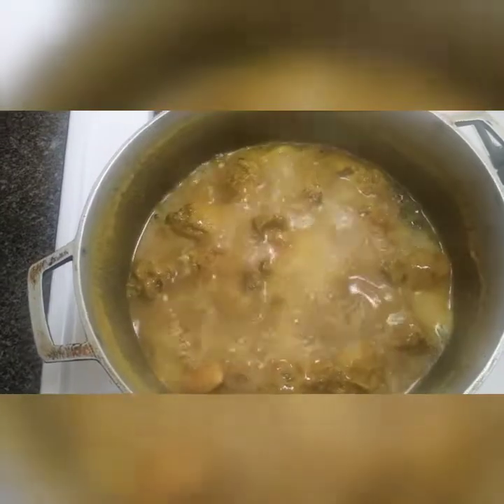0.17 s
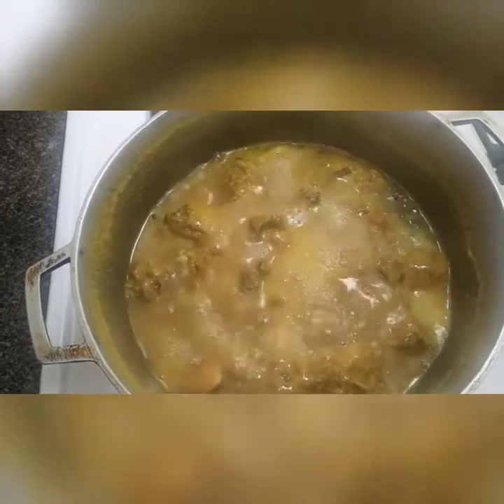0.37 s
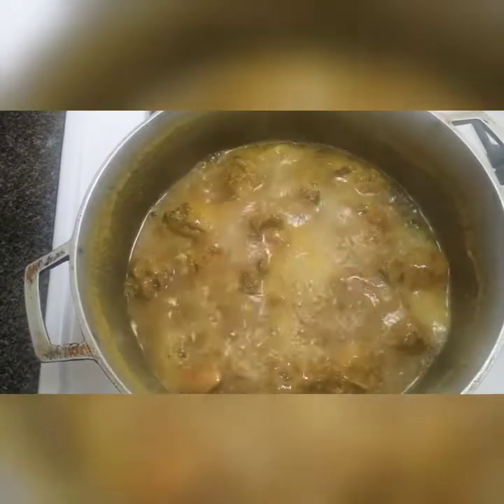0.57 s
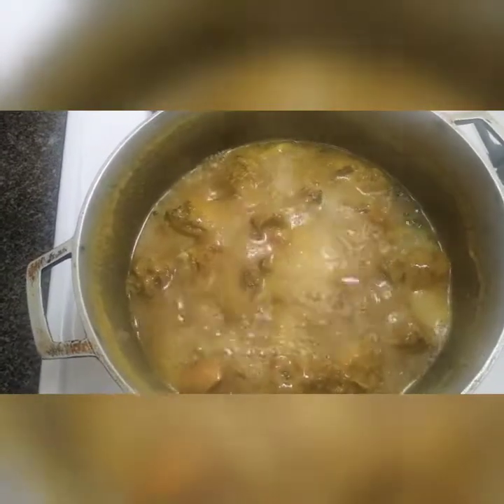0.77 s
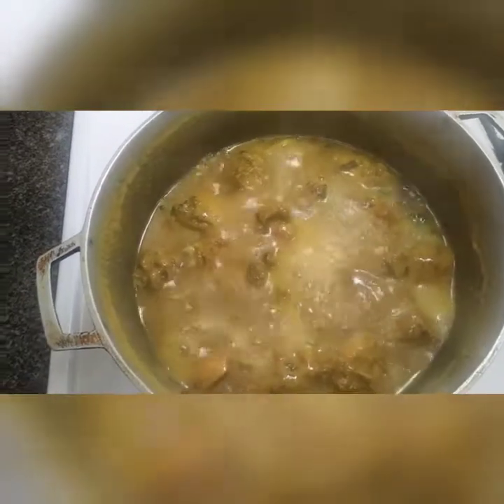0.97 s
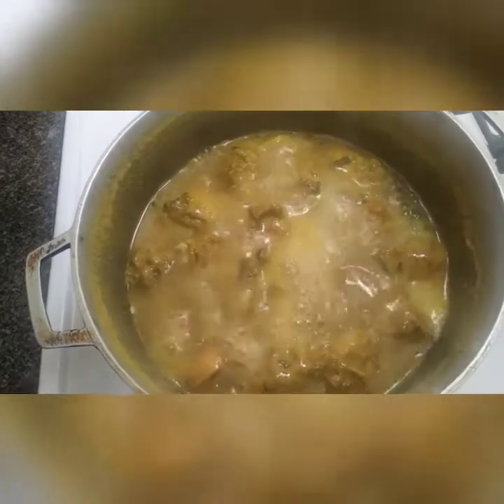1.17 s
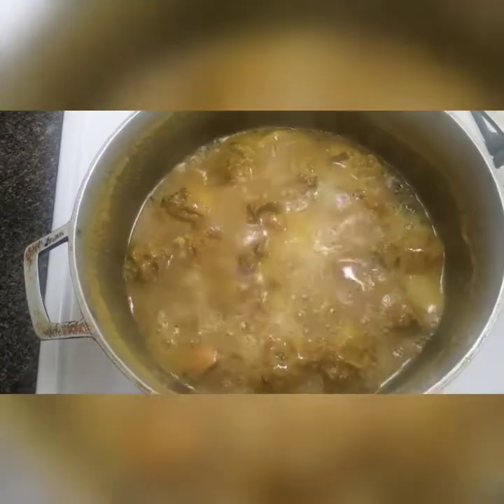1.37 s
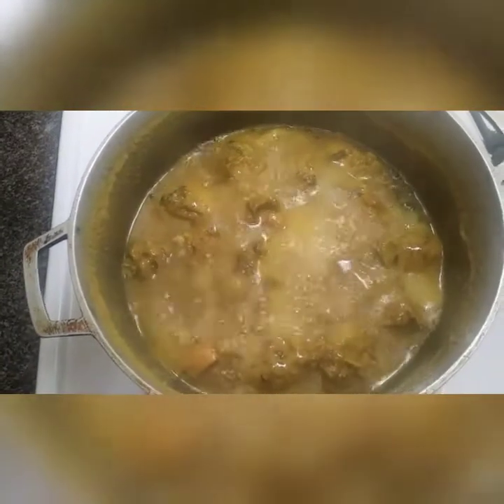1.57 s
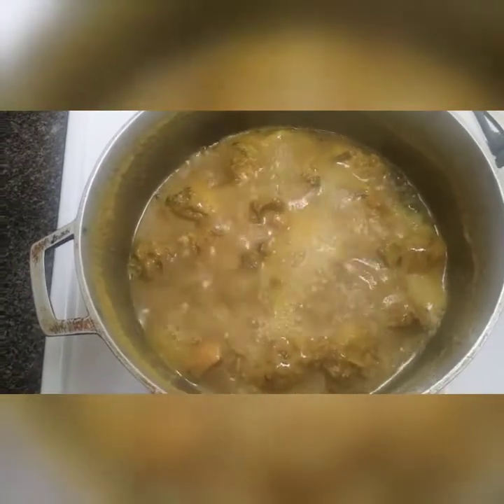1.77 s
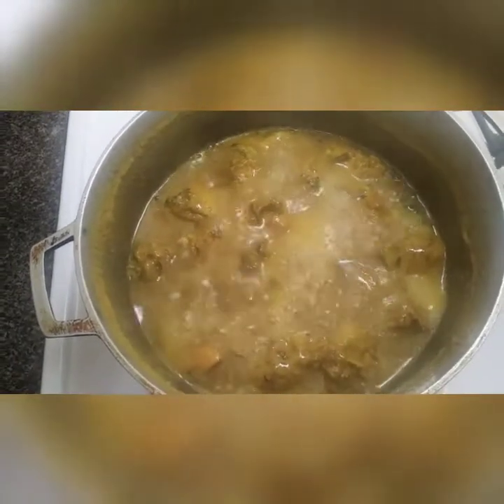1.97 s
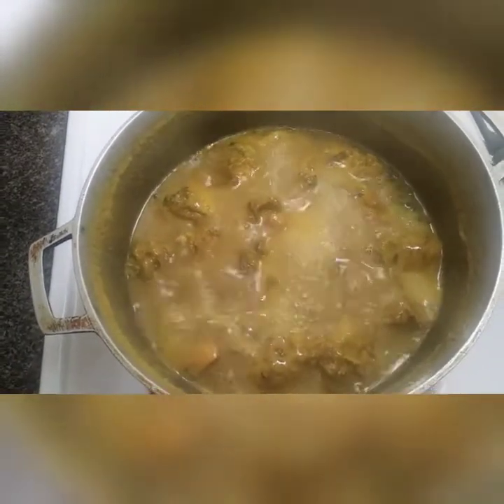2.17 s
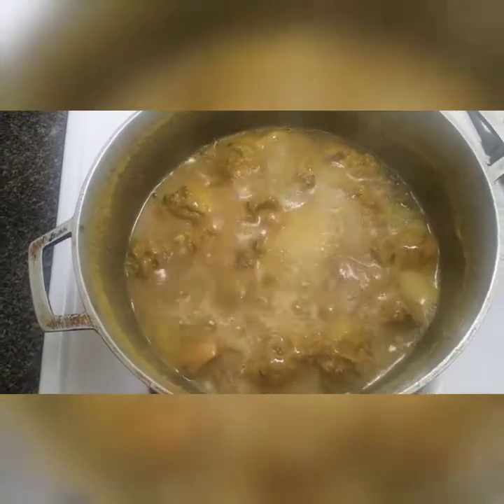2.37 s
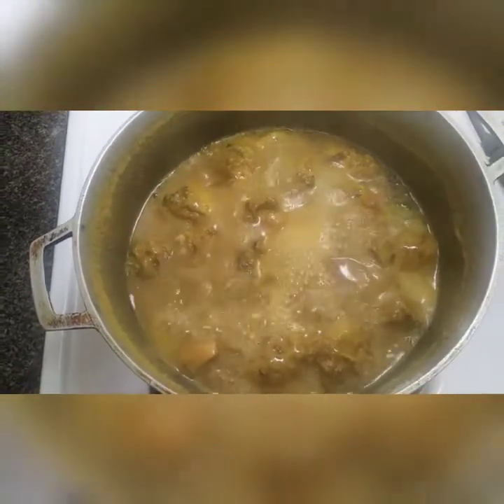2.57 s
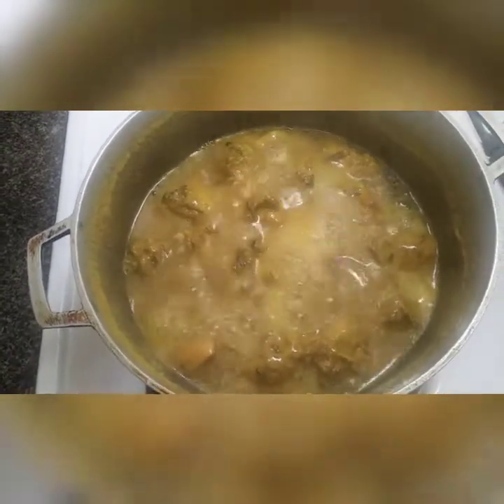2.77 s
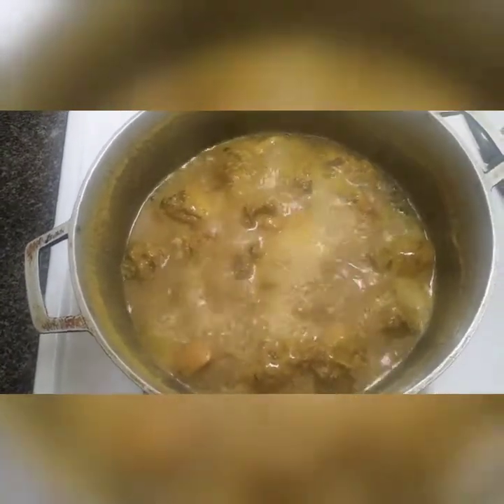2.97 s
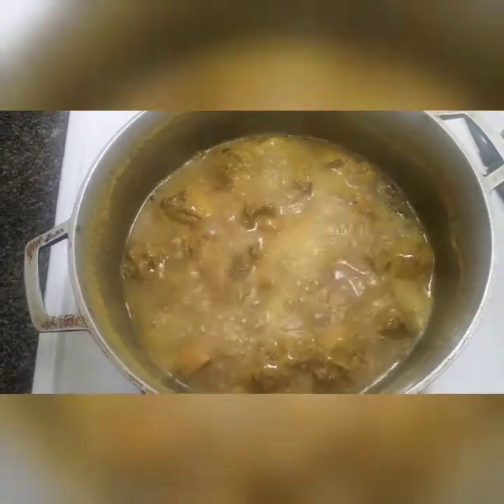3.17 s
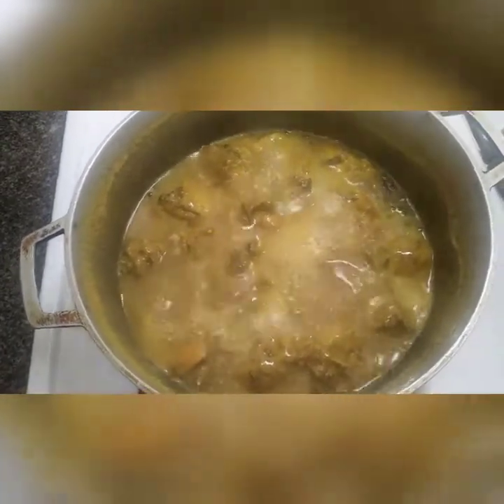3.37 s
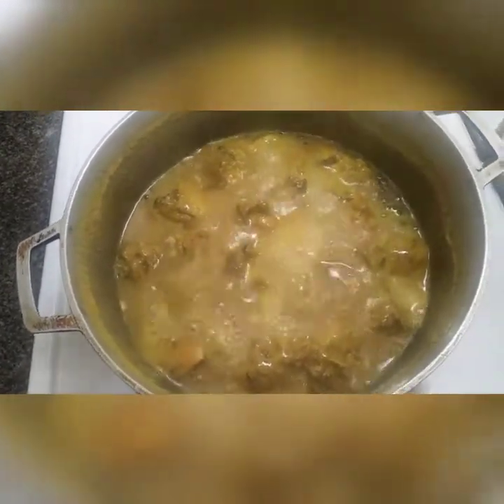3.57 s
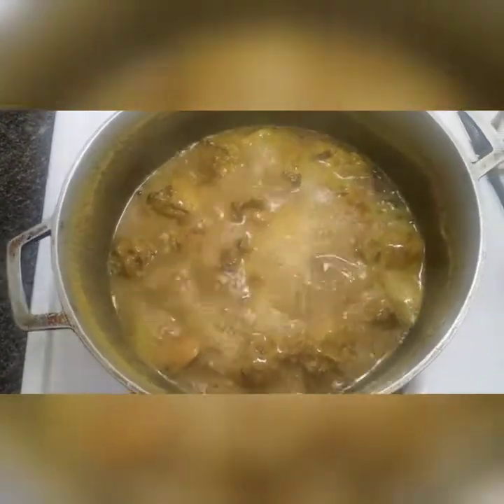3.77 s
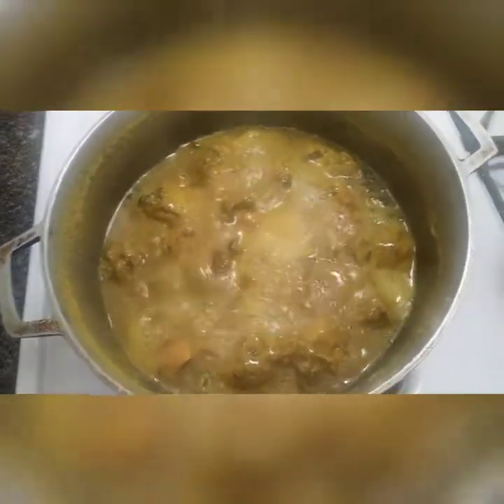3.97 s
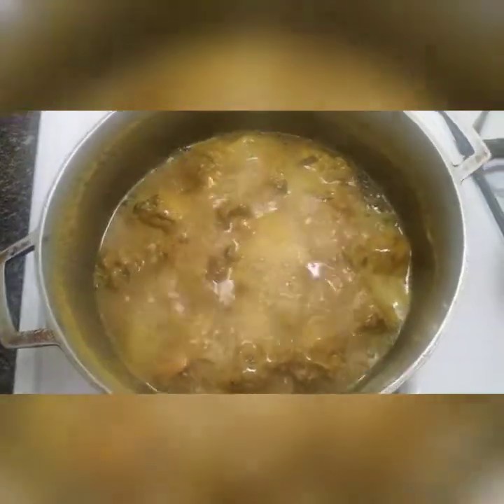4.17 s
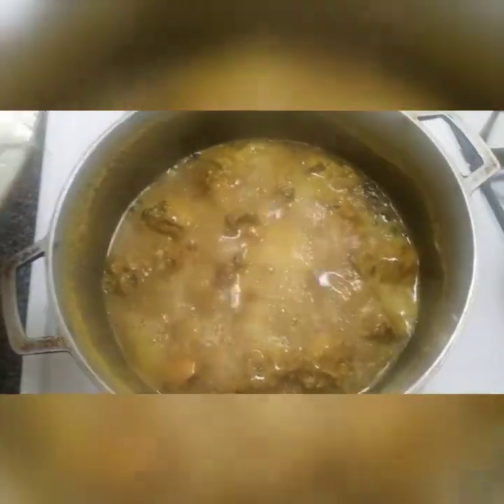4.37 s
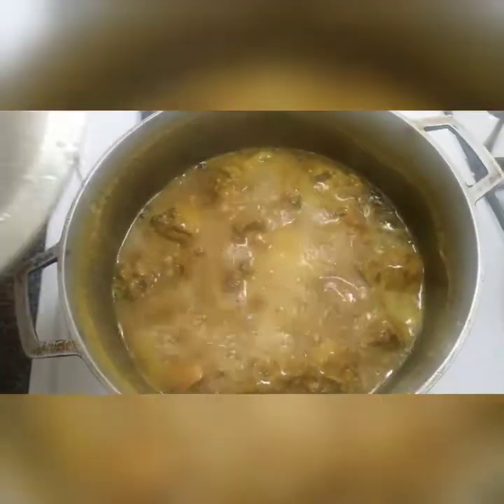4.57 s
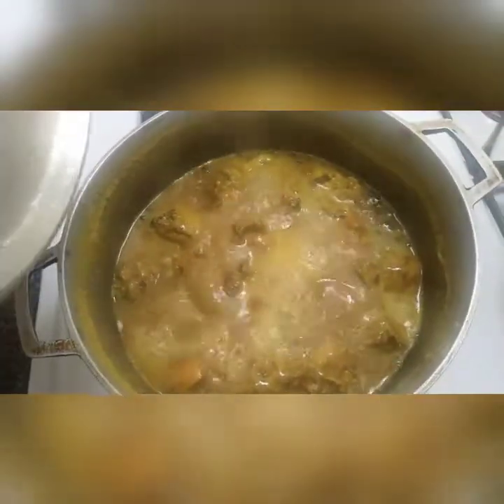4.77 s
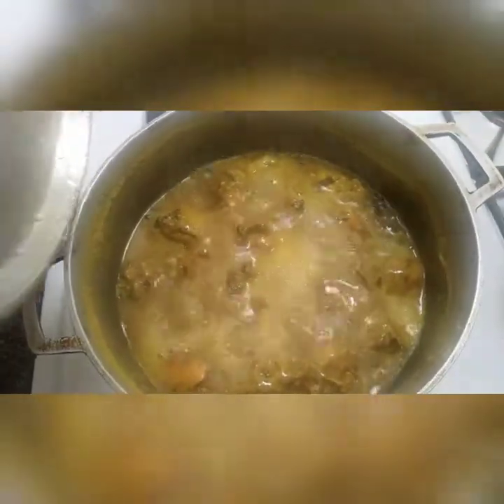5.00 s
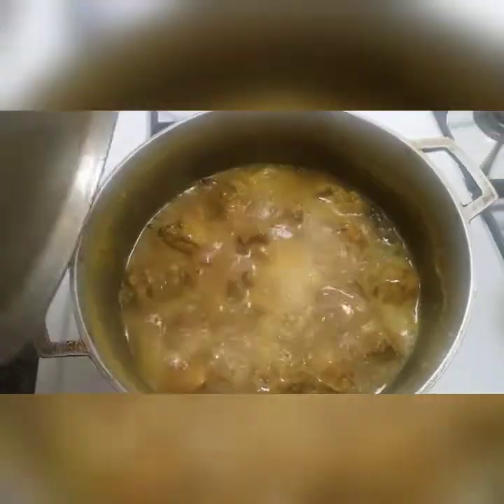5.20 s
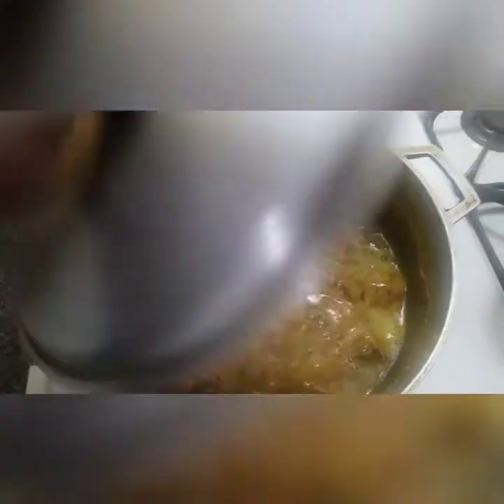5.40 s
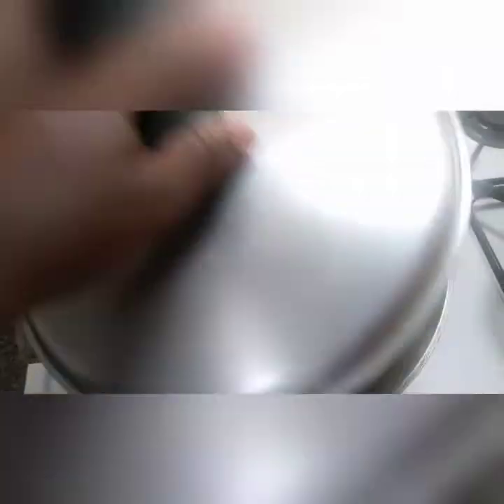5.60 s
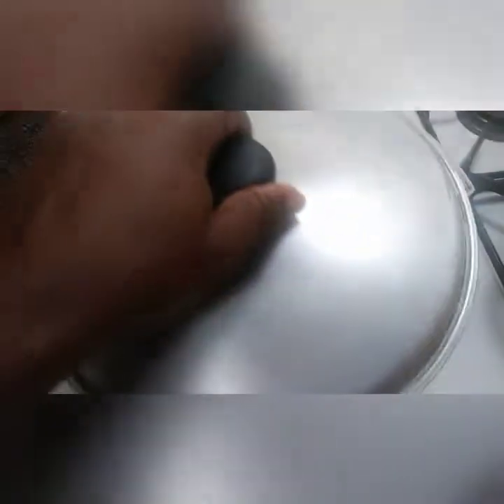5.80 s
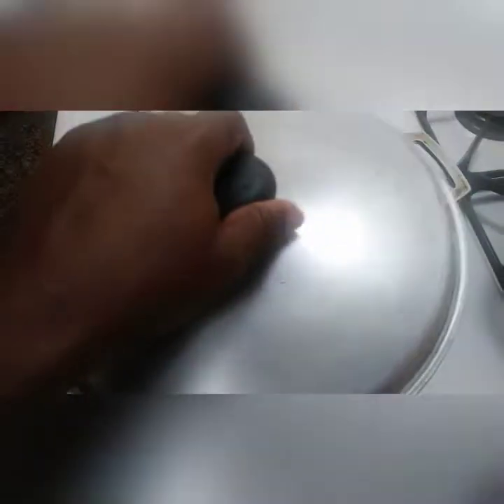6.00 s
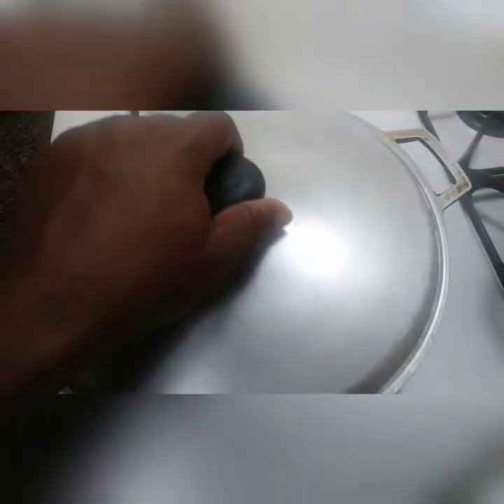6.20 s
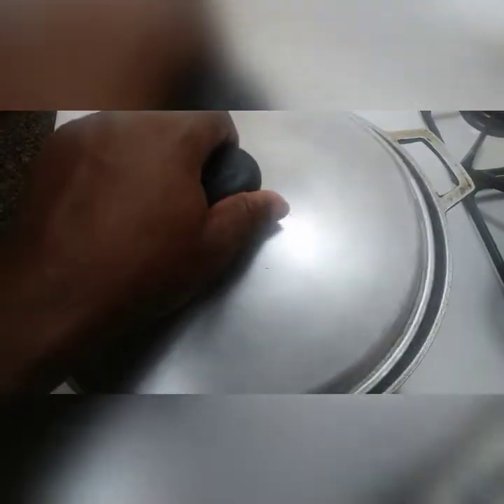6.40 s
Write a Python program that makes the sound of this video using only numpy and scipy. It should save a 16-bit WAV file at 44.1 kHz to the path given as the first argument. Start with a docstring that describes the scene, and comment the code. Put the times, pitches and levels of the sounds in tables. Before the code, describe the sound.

Close microphone over a boiling pot on a gas stove. Viscous bubbles burst continuously and unevenly, with hollow plops, deep gulps and light frothy crackle, while a quiet flame breathes underneath. The froth fades just before the end, when a metal lid bangs down far louder than the boil, rattles, grinds briefly along the rim and settles with a final knock, ringing shortly in the small room.

```python
"""In a small kitchen a thick stew boils steadily in an open aluminium pot on a gas stove.
Swelling, dying tones make the deep gurgles, the blisters popping at the surface and the ticking froth.
Coloured noise makes the flame; a narrow band of noise its faint whistle, a wavering sine the mains hum.
At the end a metal lid clatters onto the rim, scrapes across it with short groans and drops into its seat:
knocks and stick-slip clicks drive its resonant modes."""
import sys
import numpy as np
from scipy import signal
from scipy.fft import rfft, irfft, next_fast_len
from scipy.io import wavfile

SR = 44100
rng = np.random.default_rng(int(sys.argv[2]) if len(sys.argv) > 2 else 0)


def file_out(sig):
    """Save sig as 16-bit WAV at sys.argv[1]."""
    # one column per channel
    cols = np.atleast_2d(sig).T
    # limit, then scale
    lim = np.clip(cols, -1, 1)
    pcm = np.round(lim * 32767).astype(np.int16)
    wavfile.write(sys.argv[1], SR, pcm)


N = 284174
TIME = np.arange(N) / SR   # seconds


def from_db(db):
    """Logarithmic level: decibels to amplitude gain."""
    return 10 ** (np.asarray(db) / 20)


def rms_one(x):
    """Normalisation: scale to an rms of 1."""
    return x / np.sqrt(np.mean(x ** 2) + 1e-20)


def in_time(rows):
    """Linear interpolation: each column of a curve at every sample."""
    seconds, *columns = np.transpose(rows)
    return [np.interp(TIME, seconds, column) for column in columns]


def at_hz(points, hz):
    """Logarithmic pitch: read a table on a log-frequency axis."""
    table_hz, values = np.array(points)[:, 0], np.array(points)[:, 1]
    return np.interp(np.log(np.maximum(hz, 1)), np.log(table_hz), values)


def noise(spectrum, size):
    """Spectral shaping: white noise weighted to a given colour, rms 1."""
    n = next_fast_len(size)
    white = rfft(rng.standard_normal(n))
    gain = from_db(at_hz(spectrum, np.fft.rfftfreq(n, 1 / SR)))
    return rms_one(irfft(white * gain, n)[:size])


def drift(rate):
    """Slow random modulation: chance values, rate per second, joined by lines; spread about 1."""
    return np.interp(TIME * rate, np.arange(2048), rng.standard_normal(2048))


def band(x, hz, kind, order=2):
    """Band limiting: a Butterworth filter with a flat passband."""
    edges_hz = np.clip(hz, 10, SR / 2 - 1000)
    return signal.sosfilt(signal.butter(order, edges_hz, kind, fs=SR, output="sos"), x + 1e-18)


def ring(force, hz, t60):
    """Damped resonance: a unit click sets a sine of height about 1 ringing, 60 dB down after t60."""
    decay, turn = from_db(-60 / (t60 * SR)), 2 * np.pi * hz / SR   # per sample
    return signal.lfilter([0, np.sin(turn)], [1, -2 * decay * np.cos(turn), decay * decay], force + 1e-18)


def clicks(per_s, spread_db):
    """Poisson impulses: clicks at random instants, most small and a few large."""
    born = np.flatnonzero(rng.random(N) < per_s / SR)
    sizes = rng.exponential(1, 8192)
    signs = rng.choice([-1, 1], 8192)
    pick = born % len(sizes)
    out = np.zeros(N)
    out[born] = from_db(spread_db * np.minimum(sizes[pick], 4)) * signs[pick]
    return out


def add(out, s, sound):
    """Superposition: mix a sound in at a given time."""
    i = int(np.clip(round(s * SR), 0, N - 1))
    out[i:i + len(sound)] += sound[:N - i]


# Reverberation of the room. Each row: frequency in Hz, t60 in seconds.
KITCHEN_T60 = [(100, 0.91), (1000, 0.16), (4000, 0.17), (14000, 0.15)]


def kitchen(x):
    """Diffuse reverberation: an exponential noise tail off hard walls, by frequency band; unit energy."""
    t = TIME[:SR // 2]
    edges = np.geomspace(60, 18000, 9)
    tail = np.zeros(len(t))
    for low, high in zip(edges, edges[1:]):
        decay = 1000 ** (-t / at_hz(KITCHEN_T60, np.sqrt(low * high)))
        tail += band(rng.standard_normal(len(t)), [low, high], "band") * decay
    tail = tail * np.minimum(t / 0.006, 1)   # 6 ms for the echoes to build up
    return signal.oaconvolve(x, tail / np.linalg.norm(tail))[:N]


# Spectrum of gas flame and steam. Each row: frequency in Hz, relative density in dB per Hz.
FLAME_SPECTRUM = [(25, -14), (45, -17), (72, -1), (92, -7), (135, 5.5), (185, -5), (300, -6), (600, -9),
                  (1000, -8), (2900, -11.5), (3800, -18.5), (5800, -19), (9500, -31), (12500, -37)]
JET_HZ, JET_WIDTH_HZ, JET_DB = 9160, 220, -72.5   # the gas jet whistles faintly


def stove():
    """Turbulence noise: the steady flame and its jet's thin whistle, over a wavering mains hum."""
    flame = from_db(-47) * noise(FLAME_SPECTRUM, N)
    jet_edges = [JET_HZ - JET_WIDTH_HZ / 2, JET_HZ + JET_WIDTH_HZ / 2]
    jet = from_db(JET_DB) * rms_one(band(rng.standard_normal(N), jet_edges, "band"))
    hum_hz = 119.7 + 1.1 * drift(6.41)
    hum_level = from_db(-53 + 0.61 * drift(2.04))
    hum = hum_level * np.sin(2 * np.pi * np.cumsum(hum_hz) / SR)
    return flame + jet + hum


# The rim catches and groans. Each row: start in seconds, length in seconds, level in dB, pitch in Hz.
RIM_GROANS = [(6.154, .06, -24.5, 410), (6.254, 0.059, -24.5, 386), (6.339, 0.092, -18.5, 378.6)]
GROAN_WAVER_HZ, GROAN_EDGE_S = 1.97, 0.016


def groan():
    """Stick-slip locking: where the rim catches, friction locks onto one of the lid's lowest modes."""
    out = np.zeros(N)
    for s, length, db, hz in RIM_GROANS:
        edges = np.clip(np.minimum(TIME - s, s + length - TIME) / GROAN_EDGE_S, 0, 1)
        pitch = hz + GROAN_WAVER_HZ * drift(40)
        out += from_db(db) * edges * np.sin(2 * np.pi * np.cumsum(pitch) / SR)
    return out


# Lid meeting the rim. Each row: start in seconds, strength in dB, contact brightness (low-pass) in Hz.
RIM_KNOCKS = [(6.0700, 5, 8000), (6.0845, 1.5, 6800), (6.0910, 2, 5100), (6.122, -3.5, 2600),
              (6.1920, -5.5, 1920), (6.1976, -1, 2600), (6.2090, -2.5, 1610), (6.282, -6, 1600),
              (6.371, -2.5, 1596), (6.4200, 1, 2360)]
# Lid and pot ringing together, one entry a mode: pitch in Hz, rms level through the clatter in dB,
# t60 in seconds.
MODE_HZ = [386, 405, 435, 1017, 1328, 1770, 1802, 1930, 1982, 2188, 2572, 2751, 2842, 2906, 2994, 3113,
           3682, 3726, 3960, 4372, 4423, 4473, 5320, 5507, 6832, 6878, 8481, 10240, 12140, 14080]
MODE_DB = [-30.5, -32.5, -35.5, -36, -45, -23.5, -17.5, -20.5, -20.5, -25, -31.5, -34, -23, -28, -29, -30.5,
           -39, -29, -26.5, -42, -32.5, -40, -25.5, -35, -37, -36, -31.5, -42, -61, -62]
MODE_T60 = [.5, 0.25, 0.31, 0.4, .3, 0.14, 0.093, 0.22, 0.18, 0.14, 0.71, 0.36, 0.16, 0.15, 0.14, 0.51,
            0.45, 0.58, 0.37, 0.26, 0.24, 0.45, 0.26, 0.16, 0.15, 0.34, 0.16, 0.51, 0.42, 0.39]
# The many weak, short modes of the thin metal. Each row: frequency in Hz, relative density in dB per Hz.
CLASH_SPECTRUM = [(30, -40), (70, -17), (220, -15), (400, -4), (600, -6.5), (860, -42), (1020, -5),
                  (1350, -5.5), (1550, -16), (1900, 5.5), (2400, -9), (3000, -8.5), (5500, -8.5),
                  (8000, -17.5), (11000, -27), (15500, -35)]
SLIDE_START_S, SLIDE_RISE_S = 6.08, 0.069   # after landing the lid is pushed across the rim
SCRAPE_DB, SCRAPE_FADE_DB_PER_S = -36.5, 16.5   # the push eases as it goes
GRIT_DB, GRIT_RISE_S, GRIT_FADE_S = -26.5, 0.081, 0.013   # grinding peaks as the lid drops into its seat
FLUTTER_DB, FLUTTER_FROM_HZ = 4.5, 1900   # rocking on the rim; full flutter from this pitch up


def lid():
    """Modal excitation: knocks and stick-slip scraping drive the metal's damped modes."""
    landed_s, seated_s = RIM_KNOCKS[0][0], RIM_KNOCKS[-1][0]
    moving = TIME >= landed_s
    sliding_s = np.maximum(TIME - SLIDE_START_S, 0)
    slips = moving * rms_one(clicks(3000, spread_db=2.5))
    push = np.minimum(sliding_s / SLIDE_RISE_S, 1) * from_db(SCRAPE_DB - SCRAPE_FADE_DB_PER_S * sliding_s)
    scrape = push * band(slips, [330, 2400], "band", order=3)
    touches = [from_db(db) * band(signal.unit_impulse(128), hz, "low") for s, db, hz in RIM_KNOCKS]

    def force(shares):
        """Superposed contact forces: the scrape and all knocks, each with its own weight."""
        out = scrape.copy()
        for knock, touch, share in zip(RIM_KNOCKS, touches, shares):
            add(out, knock[0], share * touch)
        return out

    modes = np.zeros(N)
    for hz, db, t60 in zip(MODE_HZ, MODE_DB, MODE_T60):
        signs = rng.choice([-1, 1], len(RIM_KNOCKS))   # each knock lands on another lobe of the mode
        flutter_db = FLUTTER_DB * min(hz / FLUTTER_FROM_HZ, 1) * drift(70)
        partial = from_db(flutter_db) * ring(force(signs), hz, t60)
        modes += from_db(db) * partial / np.std(partial[moving])

    t = TIME[:SR // 3]
    crash_decay = from_db(-24 - t * 110) + from_db(-6.5 - t * 1420)   # a long part and a very short one
    crash = noise(CLASH_SPECTRUM, len(t)) * crash_decay
    clash = signal.oaconvolve(force(np.ones(len(RIM_KNOCKS))), crash)[:N]

    grinding = np.exp(np.minimum((TIME - seated_s) / GRIT_RISE_S, (seated_s - TIME) / GRIT_FADE_S))
    grit = from_db(GRIT_DB) * grinding * band(slips, [3000, 7000], "band", order=3)
    metal = band(modes, 226, "high") + clash + grit   # a thin sheet radiates little bass
    return metal + groan() + from_db(-19) * kitchen(metal)


def bubble(hz, cycles):
    """Cavity resonance: a tone that swells for the given cycles and dies as the cavity opens."""
    age = np.arange(int(8 * cycles * SR / hz)) * hz / SR   # in cycles
    swell = age / cycles * np.exp(1 - age / cycles)
    # the slope of the motion radiates; the divisor restores its height
    return np.gradient(swell * np.cos(2 * np.pi * age)) / np.sin(2 * np.pi * hz / SR)


def swarm(spectrum, per_s, cycles, spread_db, count):
    """Incoherent summation: countless random bubbles in count sizes; rms 1."""
    out = np.zeros(N)
    for hz in np.geomspace(spectrum[0][0], spectrum[-1][0], count):
        one_size = signal.oaconvolve(clicks(per_s / count, spread_db), bubble(hz, cycles))[:N]
        # a log-spaced band widens with pitch, hence the root
        out += rms_one(one_size) * from_db(at_hz(spectrum, hz)) * np.sqrt(hz)
    return rms_one(out)


def bursts(rows, cycles, snap_db, snap_ratio, spatter_db, spatter_s, thump_db, ring_s=0, count=4):
    """Cavity collapse: a loud bubble's tone, the snap of its skin, a low thump and a few daughter bubbles."""
    out = np.zeros(N)
    for (s, db, hz), chance in zip(rows, rng.random((len(rows), count, 2))):
        turns = max(cycles, ring_s * hz)
        add(out, s, from_db(db) * bubble(hz, turns))
        snap_hz = min(hz * snap_ratio, SR / 4)
        add(out, s, from_db(db + snap_db) * bubble(snap_hz, cycles=0.59))
        # the liquid falls back into the hole
        add(out, s + 2 / hz, from_db(db + thump_db) * bubble(hz / 2, cycles))
        for late, size in chance:
            daughter_hz = min(hz * 2 ** (size - .5), SR / 4)
            daughter = from_db(db + spatter_db - 19 * late) * bubble(daughter_hz, turns)
            add(out, s + late * spatter_s, daughter)
    return out


def lesser(per_s, db, spread_db, low_hz, high_hz):
    """Poisson process: rows of (s, dB, Hz) for bubbles that burst by chance."""
    chance = rng.random((128, 3))
    times = np.cumsum(-np.log(1 - chance[:, 0])) / per_s
    levels = db + spread_db * np.sqrt(3) * (2 * chance[:, 1] - 1)   # uniform, spread_db its deviation
    pitches = low_hz * (high_hz / low_hz) ** chance[:, 2]
    return [row for row in zip(times, levels, pitches) if row[0] < TIME[-1]]


# Liquid heaving round a blister, relative to its pop.
SPLASH_DB, SPLASH_RISE_S, SPLASH_FADE_S = -14.5, 0.0065, 0.0093


def splash(pops):
    """Amplitude envelope: liquid heaves around each burst with a quick swell and a slower fall."""
    out, t = np.zeros(N), TIME[:SR // 8]
    heave = np.minimum(t / SPLASH_RISE_S, np.exp((SPLASH_RISE_S - t) / SPLASH_FADE_S))
    for s, db, hz in pops:
        add(out, s - SPLASH_RISE_S, from_db(db + SPLASH_DB) * heave)
    return out


# Single bubbles: the largest blisters bursting, the sharpest droplets snapping, and the biggest bubbles
# breaking loose deep down. Each row: start in seconds, relative peak level in dB, pitch in Hz.
BLISTERS = [(0.389, -28, 1210), (0.629, -29.5, 1210), (0.691, -27, 2780), (0.72, -27, 1710),
            (0.813, -30, 1250), (0.963, -23, 2110), (0.9955, -29.5, 860), (1.237, -25, 2130),
            (1.523, -26.5, 1900), (1.733, -26, 1170), (1.9, -30.5, 650), (2.019, -27, 2700),
            (2.045, -28.5, 1490), (2.215, -28, 1180), (2.624, -32, 1740), (2.889, -27, 1210),
            (2.998, -27, 1580), (3.241, -29, 1170), (3.324, -26, 1180), (3.575, -31, 710),
            (3.721, -26, 1210), (3.7975, -25, 1190), (4.022, -24, 1260), (4.319, -24.5, 1400),
            (4.353, -28.5, 1410), (4.559, -24.5, 2970), (4.627, -23, 1560), (4.766, -29, 2140),
            (5.173, -25.5, 645), (5.315, -28, 1810)]
DROPLETS = [(1.263, -32, 8700), (1.4876, -40, 4750), (1.626, -32.5, 8300), (1.695, -26, 6320),
            (2.3583, -33.5, 5750), (2.8944, -31, 7560), (3.388, -29, 8200), (3.405, -30, 6400),
            (3.7824, -34.5, 6360), (4.2215, -33, 8300), (4.4658, -30.5, 7400), (4.631, -30.5, 5740),
            (5.0296, -27.5, 6600), (5.2844, -31, 6100)]
DEEP_BUBBLES = [(0.433, -32, 368), (1.142, -31, 272), (2.244, -30, 270), (3.185, -30, 297),
                (3.383, -33.5, 354), (4.452, -32.5, 350)]
# Lesser bubbles at random. Each holds: rate per second, mean relative peak level in dB, spread in dB,
# lowest and highest pitch in Hz.
LESSER_BLISTERS = (7, -35.5, 1, 598, 1904)
LESSER_DROPLETS = (6, -41.5, 4.5, 4500, 7500)
LESSER_DEEP = (2, -44, 3, 292, 420)
# Bubble pitches of the swarms. Each row: frequency in Hz, relative density in dB per Hz.
GURGLE_SPECTRUM = [(200, -25), (265, 4), (310, -7), (375, 3), (490, -12), (580, -4), (720, -18)]
POPPING_SPECTRUM = [(600, 10.5), (830, 3), (1000, -29), (1220, 6), (1600, 4), (2300, 4), (3000, 1.5)]
FROTH_SPECTRUM = [(4400, 1), (5300, 0.5), (6300, 2.5), (8000, -11.5), (9400, -2.5), (12000, -28),
                  (15500, -23)]
# Froth, wavering slowly, then dying away just before the lid lands. Each row: time in seconds, level in dB.
FROTH_LEVEL = [(0, -61), (1.2, -57), (3.6, -59), (5.3, -55), (5.75, -60.5), (6.0, -96)]
# Air resonances in the open pot. Each row: pitch in Hz, relative level in dB, t60 in seconds.
POT_AIR_MODES = [(271, -47, .12), (375, -26, 0.072), (569, -42, 0.074), (836, -41, 0.16),
                 (1233, -39.5, 0.11), (1487, -47, 0.15)]
GURGLE_DB, POPPING_DB = -46.5, -50.5   # the boil keeps a steady strength
POP_RING_S = 0.00031   # a blister's cavity swells at least this long, so higher ones ring more cycles
# specks of fat spitting on the hot wall
SPITS_PER_S, SPIT_DB, SPIT_SPREAD_DB, SPIT_ABOVE_HZ = 30, -46, 4, 8500


def stew():
    """Bubble acoustics: gurgles, pops and froth, coloured by pot-air resonance and the kitchen."""
    froth_db, = in_time(FROTH_LEVEL)
    blisters = BLISTERS + lesser(*LESSER_BLISTERS)
    droplets = DROPLETS + lesser(*LESSER_DROPLETS)
    deep = DEEP_BUBBLES + lesser(*LESSER_DEEP)
    surge = from_db(3.4 * drift(14))   # bubbles come in bunches

    gurgle = swarm(GURGLE_SPECTRUM, per_s=900, cycles=1.42, spread_db=2.0, count=14)
    gurgle = from_db(GURGLE_DB) * gurgle
    heave = np.hypot(from_db(POPPING_DB), splash(blisters))
    popping = heave * swarm(POPPING_SPECTRUM, per_s=1200 * surge, cycles=1.1, spread_db=3.5, count=12)
    froth = swarm(FROTH_SPECTRUM, per_s=1100 * surge, cycles=1.63, spread_db=4.5, count=12)
    froth = from_db(froth_db) * froth

    gulps = from_db(-5.5) * bursts(deep, cycles=1.8, snap_db=-18, snap_ratio=1.3,
                                   spatter_db=-5.5, spatter_s=0.062, thump_db=-19.0)
    pops = bursts(blisters, cycles=0.57, snap_db=-10, snap_ratio=1.45,
                  spatter_db=-6.5, spatter_s=.012, thump_db=-17, ring_s=POP_RING_S)
    pops = band(pops, 2820, "low", order=4)
    ticks = bursts(droplets, cycles=1.68, snap_db=-8.5, snap_ratio=0.7,
                   spatter_db=-7.0, spatter_s=0.0077, thump_db=-14)
    ticks = from_db(1.0) * band(ticks, 2900, "high")
    spits = from_db(SPIT_DB) * band(clicks(SPITS_PER_S, SPIT_SPREAD_DB), SPIT_ABOVE_HZ, "high")

    surface = popping + pops + froth + ticks + spits
    hollow = sum(from_db(db) * ring(surface, hz, t60) for hz, db, t60 in POT_AIR_MODES)
    boil = gurgle + gulps + surface + from_db(-5.0) * hollow
    return boil + from_db(-9.5) * kitchen(boil)


def scene():
    """Superposition of sources: stove, lid and pot, heard from just above the rim."""
    return (stove() + lid() + stew())[None]


CUTOFF_HZ = 15900


def record(dry):
    """Transducer response: a presence dip at the microphone port, soft overload, deep bass and top cut."""
    x = dry[0] - 0.67 * signal.lfilter(*signal.iirpeak(3750, 4.0, fs=SR), dry[0])
    x = .9 * np.tanh(x / .9)   # loud peaks are rounded off
    x = band(x, 37, "high")
    return signal.sosfilt(signal.ellip(12, .1, 80, CUTOFF_HZ, fs=SR, output="sos"), x)[None]


dry = scene()
out = record(dry)
file_out(out)
```